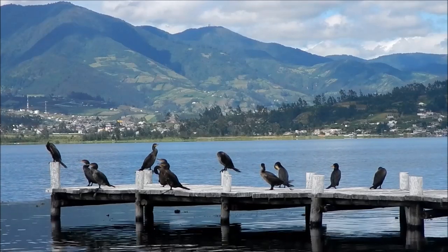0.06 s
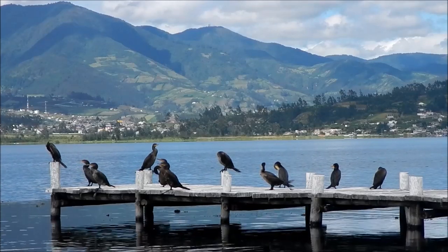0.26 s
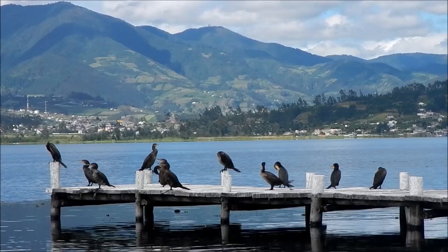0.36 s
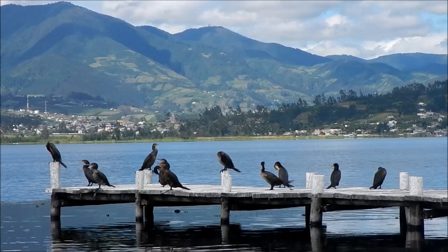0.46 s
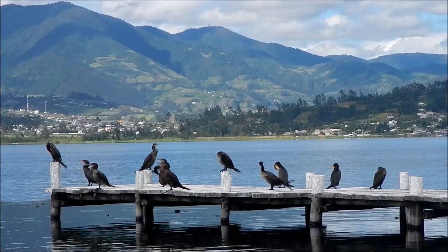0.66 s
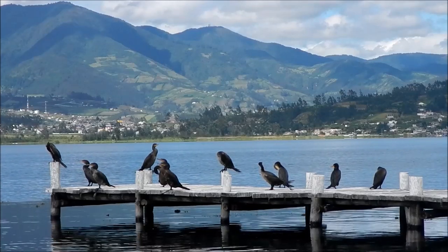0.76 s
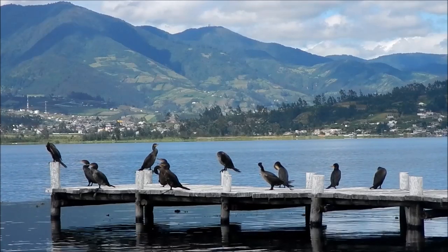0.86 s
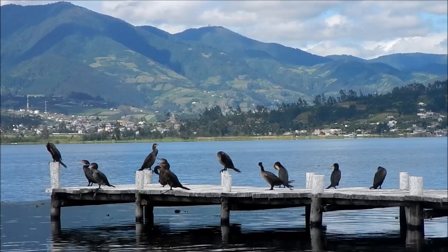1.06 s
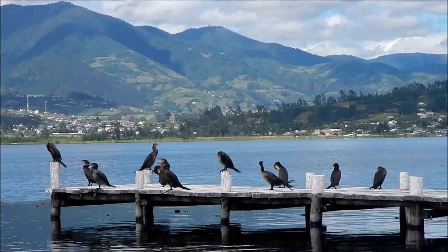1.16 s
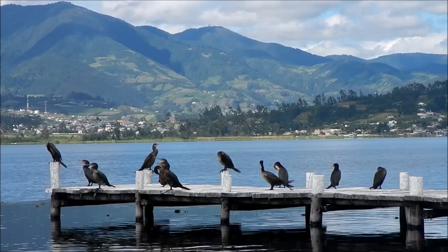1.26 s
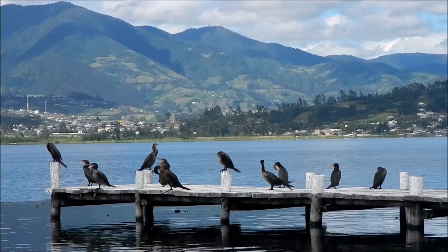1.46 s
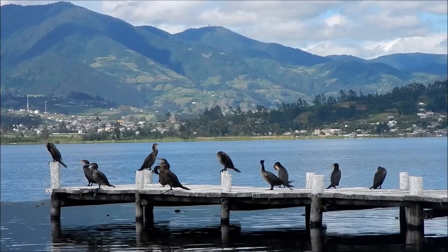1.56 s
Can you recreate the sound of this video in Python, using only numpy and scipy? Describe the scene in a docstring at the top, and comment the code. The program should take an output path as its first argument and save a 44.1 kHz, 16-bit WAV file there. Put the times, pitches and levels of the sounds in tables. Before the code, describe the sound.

One brief, low, rattling grunt from a waterbird stands out near the start, just after a soft knock. Wind and water wash steadily outdoors while a more distant bird croaks faintly and a small bird whistles thinly.

```python
"""A cormorant on a lake jetty gives one soft, dull knock and then a short grunt of four slow pulses.
Each pulse rings its windpipe, a tube closed at one end, which shortens a little as the grunt goes on.
Faint nasal croaks of a second bird and a thin whistle follow from further off, over a steady wash of wind and water."""
import sys
import numpy as np
from scipy import signal
from scipy.fft import rfft, irfft
from scipy.io import wavfile
from scipy.ndimage import uniform_filter1d

SR = 44100
rng = np.random.default_rng(int(sys.argv[2]) if len(sys.argv) > 2 else 0)


def to_wav(s):
    """Save 16-bit WAV."""
    ch = np.atleast_2d(s).T  # columns
    pcm = np.round(np.clip(ch, -1, 1) * 32767)  # PCM
    wavfile.write(sys.argv[1], SR, pcm.astype(np.int16))


N = 70560

# throat pulses: (s, strength dB, windpipe tuning as a ratio, treble corner Hz)
PULSES = [(.2970, -4.6, .987, 7500), (.3201, -3, 1.002, 8800), (.3467, -4.4, 1.012, 4800), (.3749, -10, 1.028, 4600)]  # fixed
# the throat leaks a weak, dull pulse just before it snaps open
LEAK_LEAD_S, LEAK_DB, LEAK_HZ = .0052, -18, 1300  # fixed
# windpipe resonances: (Hz, width Hz, dB)
WINDPIPE = [(366, 70, 4), (570, 260, -9), (830, 170, -11), (990, 145, 3), (1200, 200, -14), (1562, 110, -4), (2199, 90, -.5), (2880, 95, -2), (3510, 900, -7), (4320, 95, 6.5), (4905, 100, 3), (5530, 105, -1), (6285, 260, -1), (6877, 300, -3), (7590, 400, -3), (8400, 380, -4)]  # fixed
# colour of one pulse: (Hz, dB)
SNAP = [(40, -69), (130, -20.5), (250, -9.5), (370, -3), (620, 0.5), (990, 0.5), (1580, -1), (2200, -0.5), (2900, -13.5), (4300, -22.5), (6300, -21.5), (8400, -33), (12000, -34), (16000, -75)]
BIRD_DB = 24
# the jetty and water scatter a little of the call
SCATTER_DB, SCATTER_T60_S, SCATTER_DELAY_S = -17.5, 0.11, 0.0025
# wind and water: (Hz, dB per Hz)
WASH = [(20, -21.5), (45, -29), (66, -21), (110, -14), (180, -2), (230, -2.5), (267, 1.8), (298, -2), (360, 0), (430, -3), (485, -5), (550, -1), (610, -4.5), (680, -5), (1000, -7.5), (1750, -15.5), (3170, -18), (5000, -21), (8600, -25), (12000, -34.5), (15500, -37.5)]
# level of the wash: (s, dB)
WASH_LEVEL = [(0, -42.5), (.4, -41.5), (.8, -43), (1.2, -41.5), (1.6, -42)]
# the middle of the wash swells on its own: (s, dB), and its share by frequency: (Hz, share 0-1)
MID_SWELL = [(0, -.5), (.5, 0), (.75, 0), (.92, 1.5), (1.1, 0.2), (1.3, 0.3), (1.5, 0.9), (1.6, 1)]
MID_BAND = [(250, 0), (450, 1), (850, 1), (1500, 0)]  # fixed
PATCH_DB, HISS_FOLLOW = 0.45, 0.6
EDGE_HZ = 15720  # fixed
# a far small bird's thin whistle: (s, Hz, dB)
WHISTLE = [(1.385, 3200, -75), (1.42, 3390, -56), (1.455, 3600, -72), (1.487, 3470, -56.5), (1.525, 3340, -59.5), (1.555, 3280, -75)]  # fixed
WHISTLE_WAVER = .01  # fixed
# the soft knock before the grunt: time (s), strength (dB), treble corner (Hz)
KNOCK_S, KNOCK_DB, KNOCK_HZ = .2095, -11, 1700  # fixed
# resonances of the slack throat in that knock: (Hz, width Hz, dB)
SLACK_THROAT = [(305, 110, -1), (587, 90, -1), (872, 105, 2), (1440, 110, 0), (2040, 80, -7)]  # fixed
# colour of the knock's soft push: (Hz, dB)
SOFT_SNAP = [(40, -50), (250, -6), (550, -1), (1500, 0), (2050, -4), (2400, -22), (4000, -36), (16000, -60)]  # fixed
# throat pulses of the further bird: (s, strength dB, throat tuning as a ratio)
FAR_PULSES = [(1.090, -37, .78), (1.174, -33, 1.42), (1.1795, -31, 1.64), (1.233, -35, 1.04), (1.2403, -27, 1.02), (1.2535, -28, 1), (1.2573, -29, .99), (1.270, -36, 1), (1.2768, -33, 1.02), (1.434, -33, 1.04), (1.445, -33, .86)]  # fixed
# its resonances: (Hz, width Hz, dB)
FAR_THROAT = [(1170, 170, 0), (1560, 100, 1), (1810, 160, -6), (2060, 130, -3), (2750, 400, 0)]  # fixed
FAR_CORNER_HZ, FAR_SCATTER_DB, FAR_T60_S = 5000, -4, .08  # fixed


def amp(db):
    """Decibels to gain."""
    return 10 ** (np.asarray(db) / 20)


def evened(x):
    """Scales to rms 1."""
    return x / np.sqrt(np.mean(x ** 2) + 1e-20)


def read(points, hz):
    """Reads a spectrum on a log-frequency axis."""
    f, value = np.transpose(points)
    return np.interp(np.log(hz + 1), np.log(f + 1), value)


def add(mix, s, sound):
    """Mixes a sound in at s seconds."""
    part = mix[round(s * SR):][:len(sound)]
    part += sound[:len(part)]


def noise(colour):
    """Noise of rms 1 with the given spectrum."""
    return evened(irfft(rfft(rng.standard_normal(N)) * amp(read(colour, np.fft.rfftfreq(N, 1 / SR))), N))


def causal(gain):
    """The response with these gains that starts sharply and rings afterwards."""
    log_gain = np.log(np.maximum(np.r_[gain, gain[-2:0:-1]], 1e-6))
    return np.exp(np.conj(signal.hilbert(log_gain)))[:len(gain)]


def pulse(modes, colour, db, tuning, corner_hz, size=4096):
    """One snap of the throat ringing through its resonances."""
    hz = np.fft.rfftfreq(size, 1 / SR)
    snap = causal(amp(read(colour, hz)) / np.sqrt(1 + np.square(np.square(hz / corner_hz))))
    pipe = sum(amp(g) * 1j * hz * w / ((f * tuning) ** 2 - hz ** 2 + 1j * hz * w) for f, w, g in modes)
    return amp(BIRD_DB + db) * irfft(snap * pipe, size)


def cormorant():
    """The soft knock (it starts with a drop in pressure), then every pulse of the grunt, each with its weak leak ahead of it."""
    out = np.zeros(N)
    add(out, KNOCK_S, -pulse(SLACK_THROAT, SOFT_SNAP, KNOCK_DB, 0.96, KNOCK_HZ))
    for s, db, tuning, corner_hz in PULSES:
        add(out, s, pulse(WINDPIPE, SNAP, db, tuning, corner_hz))
        add(out, s - LEAK_LEAD_S, pulse(WINDPIPE, SNAP, db + LEAK_DB, tuning, LEAK_HZ))
    return out


def scatter(x, db, t60_s):
    """A short tail of outdoor reflections."""
    t = np.arange(SR // 2) / SR
    tail = rng.standard_normal(len(t)) * amp(-60 * t / t60_s) * (t > SCATTER_DELAY_S)
    return amp(db) * signal.fftconvolve(x, tail / np.linalg.norm(tail))[:N]




def wash(size=1024):
    """Wind and water: noise with drifting patches; its hiss swells a little more than its body."""
    hz, t, z = signal.stft(noise(WASH), SR, nperseg=size, noverlap=size * 3 // 4)  # fixed
    patches = evened(uniform_filter1d(uniform_filter1d(rng.standard_normal(z.shape), size=10, axis=0), size=14, axis=1))
    level = np.interp(t, *np.transpose(WASH_LEVEL))
    follow = read([(1200, 0.52), (4000, HISS_FOLLOW)], hz)[:, None]
    swell = read(MID_BAND, hz)[:, None] * np.interp(t, *np.transpose(MID_SWELL))
    z = z * amp(level.mean() + swell + follow * (level - level.mean() + PATCH_DB * patches))
    return signal.istft(z, SR, nperseg=size, noverlap=size * 3 // 4)[1][:N]  # fixed


def whistle():
    """One faint, wavering arch of pitch that thins out at its top."""
    at, hz, db = np.transpose(WHISTLE)
    t = np.arange(N) / SR
    waver = 1 + WHISTLE_WAVER * evened(uniform_filter1d(rng.standard_normal(N), size=200))
    level = np.interp(t, at, amp(db), left=0, right=0)
    return level * np.sin(2 * np.pi * np.cumsum(np.interp(t, at, hz) * waver) / SR)


def far_bird():
    """Uneven pulses through a second, nasal throat, blurred by reflections."""
    out = np.zeros(N)
    for s, db, tuning in FAR_PULSES:
        add(out, s, pulse(FAR_THROAT, SNAP, db, tuning, FAR_CORNER_HZ))
    return out + scatter(out, FAR_SCATTER_DB, FAR_T60_S)


def scene():
    """Everything is heard from the centre."""
    bird = cormorant()
    return np.tile(bird + scatter(bird, SCATTER_DB, SCATTER_T60_S) + far_bird() + whistle() + wash(), (2, 1))


def record(dry):
    """The recorder's band limit."""
    return signal.oaconvolve(dry, signal.firwin(511, EDGE_HZ, window=("kaiser", 9), fs=SR)[None], "same")  # fixed


dry = scene()
out = record(dry)
to_wav(out)
```